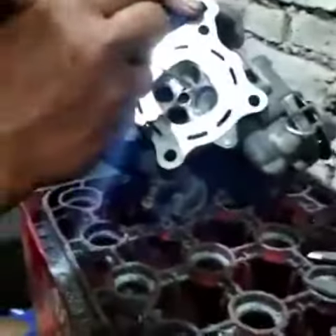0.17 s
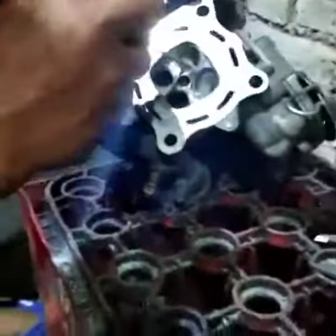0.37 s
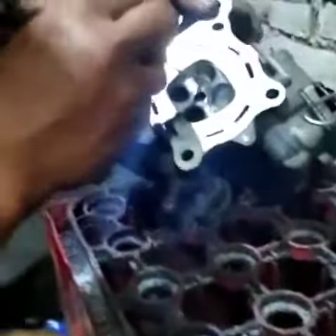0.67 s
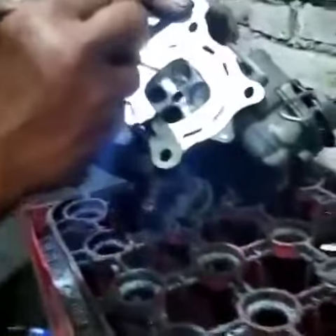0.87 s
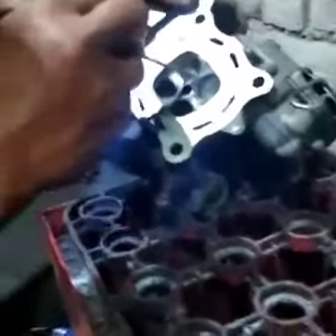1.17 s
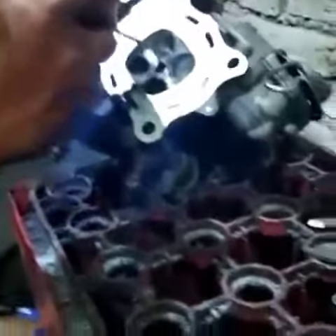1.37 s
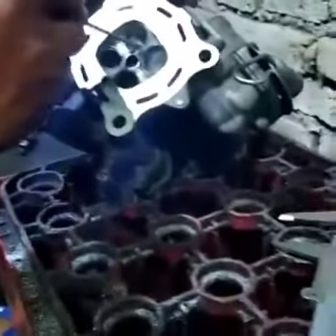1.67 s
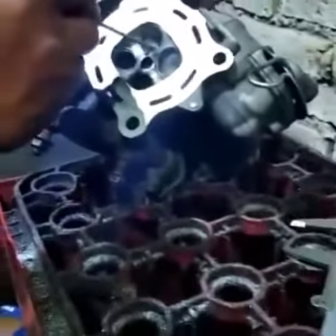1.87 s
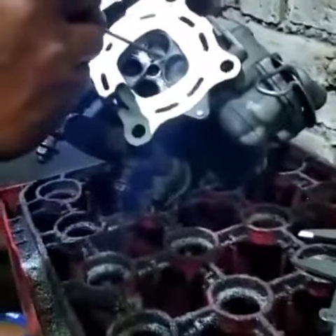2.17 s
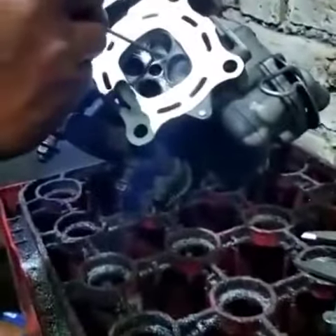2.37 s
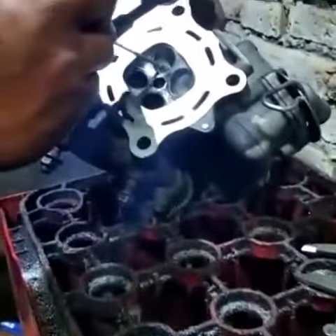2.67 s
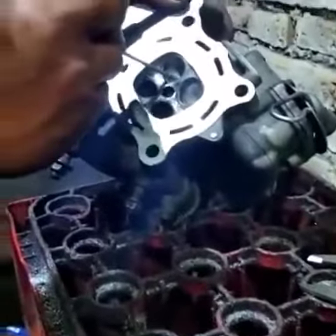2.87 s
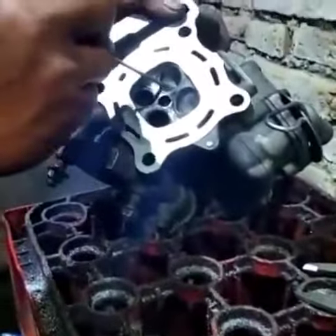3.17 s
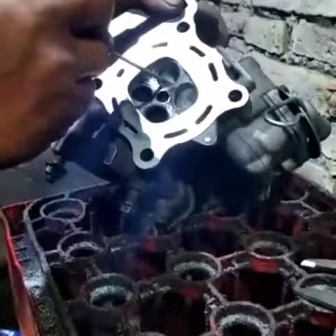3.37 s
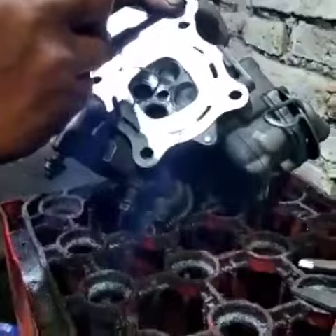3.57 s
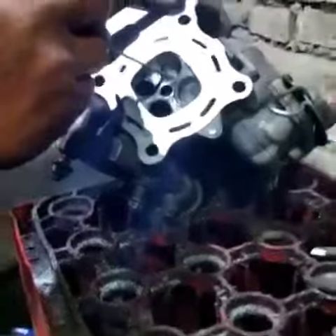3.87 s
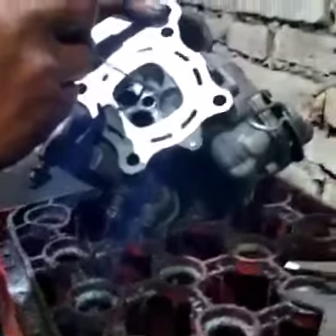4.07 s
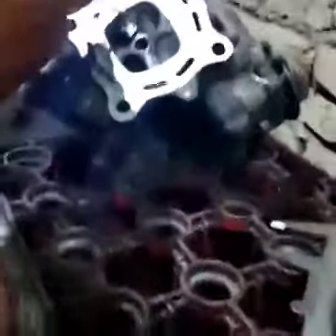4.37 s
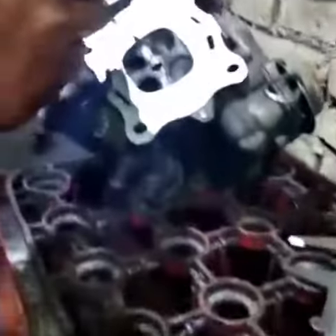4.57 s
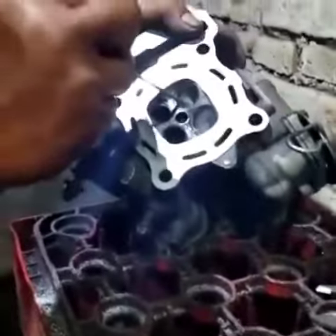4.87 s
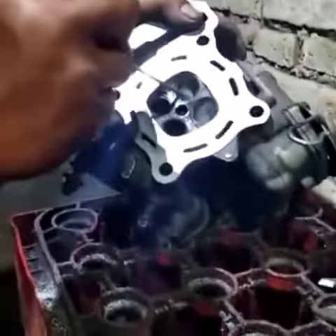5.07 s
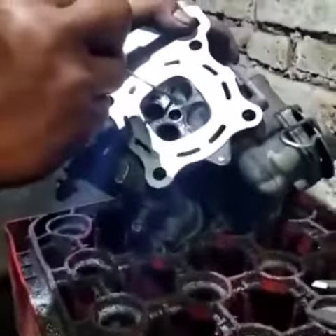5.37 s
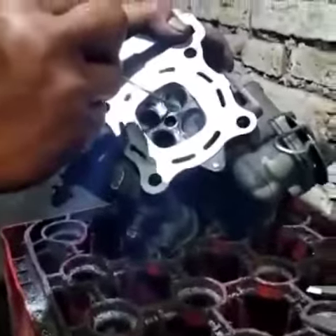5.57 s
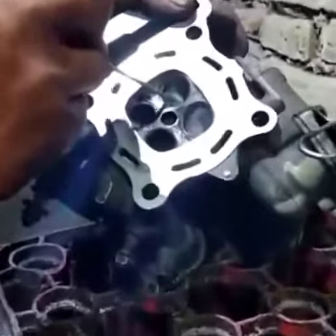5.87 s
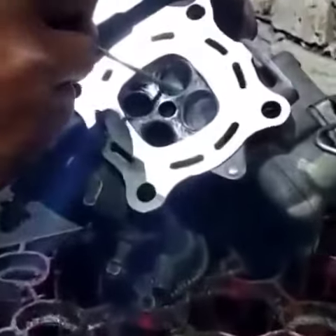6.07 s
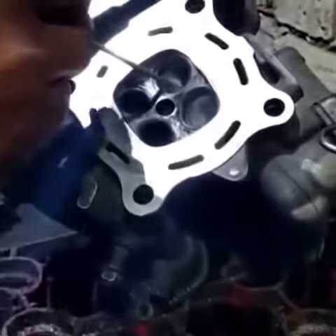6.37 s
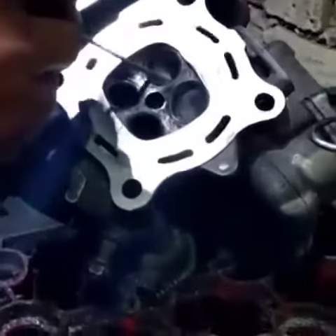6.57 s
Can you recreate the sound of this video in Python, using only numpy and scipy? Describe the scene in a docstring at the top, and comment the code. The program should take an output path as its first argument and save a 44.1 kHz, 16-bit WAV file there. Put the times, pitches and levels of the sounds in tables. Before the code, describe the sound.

A hand-held rotary grinder cuts inside the port of a cast metal cylinder head, close to the microphone in a workshop. For the first half second the bit touches lightly, with scratchy catches and thin steel ticks; another tick comes near 1.1 seconds. From about 0.6 seconds it bites steadily, a dense hissing rasp with rapid chatter and a metallic ring. It speeds up and is loudest between 2 and 3 seconds, snagging on edges. The chatter slows around 4 seconds, then quickens to the end at about 6.7 seconds, turning slightly fizzier after 5 seconds as the bit goes deeper. Small dull bumps touch the microphone near 3.6 and 4.2 seconds. Throughout, a distant engine drones quietly on the left over a low rumble and a faint murmur of other machines.

```python
"""Grinding a cylinder head port

A hand-held rotary grinder cuts inside a port of a cast metal cylinder head in a workshop. The bit runs
slightly out of true, so it bites once a turn; its chips ring the casting and rasp in the treble.
A single-cylinder engine drones far off on the left over a low rumble, and other machines murmur.
Steel ticks thinly near the start; later the camera takes a few dull bumps."""
import sys
import numpy as np
from scipy import signal
from scipy.fft import rfft, irfft, next_fast_len
from scipy.io import wavfile
from scipy.ndimage import uniform_filter1d, map_coordinates

SR = 44100
rng = np.random.default_rng(int(sys.argv[2]) if len(sys.argv) > 2 else 0)


def dump(signal):
    """Clip the signal to [-1, 1] and save it as 16-bit WAV at the path in sys.argv[1]."""
    limited = np.clip(np.atleast_2d(signal).T, -1, 1)
    pcm = np.round(limited * 32767).astype(np.int16)
    wavfile.write(sys.argv[1], SR, pcm)


N = 296352
FFT_SIZE = next_fast_len(N + SR // 2)


def amp(db):
    return 10 ** (np.asarray(db) / 20)


def unit_rms(x):
    return x / np.sqrt(np.mean(x ** 2) + 1e-20)


def curves(rows):
    """One per-sample curve for each column after time_s."""
    time_s, *columns = np.transpose(rows)
    return [np.interp(np.arange(N) / SR, time_s, column) for column in columns]


def wobble(rate_hz):
    """Smooth random curve, rate_hz knots a second."""
    knots = rng.standard_normal(int(N * rate_hz / SR) + 4)
    return map_coordinates(knots, [np.arange(N) * rate_hz / SR])


def filtered(x, response):
    """Filter x by a complex function of frequency in Hz."""
    hz = np.fft.rfftfreq(FFT_SIZE, 1 / SR)
    return irfft(rfft(x, FFT_SIZE) * response(hz), FFT_SIZE)[..., :N]


def shaped(x, spectrum):
    """Filter x by rows of freq_hz, gain_db, ..., joined on a log frequency axis."""
    freq_hz, *gains_db = np.transpose(spectrum)
    return filtered(x, lambda hz: amp([np.interp(np.log1p(hz), np.log1p(freq_hz), g) for g in gains_db]))


# Grinder speed: time_s, rotation_hz
SHAFT_SPEED = [(0, 38), (0.2, 47), (0.5, 51.2), (0.8, 63), (1.4, 77.5), (2.0, 85), (3.2, 89.5), (3.8, 75.1),
               (4.15, 70.8), (4.4, 73.1), (5.3, 92.3), (5.9, 100.2), (6.72, 107.7)]
def bite(runout):
    """The bit's high spot strikes once a turn: a levelled force row per runout value, and knocks."""
    speed_hz, = curves(SHAFT_SPEED)
    turns = np.cumsum(speed_hz * (1 + 0.00988 * wobble(15))) / SR
    strength = amp(0.7 * rng.standard_normal(int(turns[-1]) + 2))[turns.astype(int)]
    # A fast bit skims more evenly; spinning up, it barely touches.
    skim = np.clip(78 / speed_hz, 0, 1.15) ** 2 * np.clip((speed_hz - 40) / 22, 0.3, 1)
    high_spot = strength * skim * np.exp(2.2 * (-np.cos(2 * np.pi * turns) - 1))
    unsteady_hand = amp(0.51 * wobble(23) + 0.5 * wobble(40))
    force = (1 + np.array(runout)[:, None] * high_spot) * unsteady_hand
    running_rms = np.sqrt(np.abs(uniform_filter1d(force ** 2, SR // 8, axis=1)))
    knocks = strength * skim * np.diff(np.floor(turns + 0.5), prepend=0)
    return force / running_rms, knocks


def chips(spiky_db, diffuse_share):
    """Dense chips of uneven size; the diffuse share reaches each microphone by its own path."""
    noise = rng.standard_normal((3, N))
    size = amp(spiky_db * np.clip(rng.standard_normal(N), -2, 2))
    direct, left, right = unit_rms(noise * size)
    return np.sqrt(1 - diffuse_share) * direct + np.sqrt(diffuse_share) * np.array([left, right])


# Bit position: time_s, depth_fraction
BIT_DEPTH = [(0, 0.15), (1, 0.25), (2, 0.19), (3, 0.3), (4, 0.41), (4.85, 0.33), (5.0, 0.78), (5.9, 0.96),
             (6.1, 1), (6.25, 0.97), (6.72, 0.93)]
def bit_depth():
    """Where the bit works: 0 at the port mouth, 1 deep inside."""
    return curves(BIT_DEPTH)[0]


def ringing(drive, modes, waver_db):
    """Each mode has its own left-right pattern; its share wavers as the bit wanders over the wall."""
    hz, spectrum = np.fft.rfftfreq(FFT_SIZE, 1 / SR), rfft(drive, FFT_SIZE)
    depth, out = bit_depth(), 0
    for k, (pitch_hz, width_hz, left_db, right_db, left_lead_rad, deep_gain_db) in enumerate(modes):
        damping = 1j * hz * width_hz
        resonance = (-1) ** k * (damping / (pitch_hz ** 2 - hz ** 2 + damping)) ** 2
        pattern = np.array([[amp(left_db) * np.exp(1j * left_lead_rad)], [amp(right_db)]])
        mode = irfft(spectrum * resonance * pattern, FFT_SIZE)[:, :N]
        out = out + amp(deep_gain_db * depth + waver_db * wobble(7)) * mode
    return out


# Casting and port modes: pitch_hz, width_hz, left_db, right_db, left_lead_rad, deep_gain_db
CASTING_MODES = [(479, 82, -30.5, -36.5, 1, 5), (545, 69, -31, -33, 1.1, 9.5),
                 (689, 154, -43, -24.5, 2, -3.5), (1002, 103, -20, -22, -2.1, -5),
                 (1088, 78, -19, -35, 1.3, 9), (1234, 74, -22.5, -29, 0.36, 2.5),
                 (1412, 126, -20, -18, 4, 3), (1540, 105, -12.5, -11, 3.5, 1), (1729, 124, -20, -4, 2, 1),
                 (1930, 135, -3.5, -0.5, 2, -0.5), (2110, 83, 3, 1.5, 3.5, -1.5),
                 (2210, 163, -2.5, -10.5, 1, 5.5), (2404, 53, -1, -8.5, 3.5, -4),
                 (2707, 87, -11.5, -12.5, 0, -9), (3065, 86, -3, -6, -2, -3.5),
                 (2077, 725, -6.5, -19, 3.5, 2)]
def casting_ring(pressure, force, knocks, jolts):
    """Chips and a dull knock on every turn ring the heavy casting."""
    dull_knocks = amp(29.5) * filtered(knocks, lambda hz: 1 / (1 + 1j * hz / 900))
    chip_drive = (pressure * force + jolts) * chips(spiky_db=4, diffuse_share=0.24)
    return ringing(chip_drive + pressure * dull_knocks, CASTING_MODES, waver_db=0.85)


# Thin wall and bit modes: pitch_hz, width_hz, left_db, right_db, left_lead_rad, deep_gain_db
WALL_MODES = [(2190, 200, -5, -3, 1.5, -2), (3100, 115, -6, -1.5, -3, -4),
              (3326, 150, -6.5, -7.5, -1.5, -1), (4216, 200, -14.5, -11.5, 1.1, 4.5),
              (5890, 130, -13, -12, -2.5, 6), (3820, 340, -7, -12, 2.5, -6), (4542, 450, -14, -5.5, 1, 1),
              (5000, 223, -10.5, -11, 0.6, 8.5), (6250, 300, -14, -16, -2.4, 0),
              (7385, 450, -18, -8, 1.5, -0.5), (8416, 164, -18.5, -9, 2, 13),
              (8990, 160, -5.5, -5, 1.3, 4.5), (9900, 340, -5.5, -14, 2.5, -2)]
# Spectrum of breaking chips: freq_hz, left_db, right_db
RASP_SPECTRUM = [(295, -28, -52), (910, -18, -10.5), (2520, -5.5, -5), (2920, -4, -3.5), (4880, -7, -7),
                 (5800, -12, -9.5), (6660, -6, -3.5), (8600, -4, -2.5), (10000, -3, -5), (10170, -7, -10.5),
                 (9970, -10, -8), (11320, -10.5, -11.5), (13400, -17, -19), (14100, -11, -23)]
def chip_rasp(pressure, force, jolts):
    """Chips ring the thin walls and rasp as they break; deep inside, scrape falls and fizz rises."""
    grit = pressure * force * amp(0.56 * wobble(21.98)) + jolts
    walls = amp(3) * ringing(grit * chips(spiky_db=6.5, diffuse_share=0.29), WALL_MODES, waver_db=2)
    bright = walls + shaped(grit * chips(spiky_db=1.5, diffuse_share=1), RASP_SPECTRUM)
    scrape = filtered(bright, lambda hz: 1 / (1 + (hz / 5800) ** 12))
    fizz = filtered(bright, lambda hz: 1 / (1 + (10300 / (hz + 1)) ** 30))
    middle = bright - scrape - fizz
    depth, scrape_deep_db, fizz_deep_db = bit_depth(), -1.5, 1
    scrape_gain = amp(scrape_deep_db * depth)
    fizz_gain = amp(fizz_deep_db * depth + 1.1 * wobble(4.7))
    return scrape_gain * scrape + middle + fizz_gain * fizz


def ragged_spectrum(x, patchy_db):
    """Narrow patches of the spectrum swell and sink at random, a ragged warble as in compressed audio."""
    spectra = signal.stft(x, nperseg=1024)[2]
    patches = uniform_filter1d(rng.standard_normal(spectra.shape[1:]), size=3, axis=0)
    patches = uniform_filter1d(patches, size=5, axis=1)
    return signal.istft(spectra * amp(patchy_db * unit_rms(patches)), nperseg=1024)[1][:, :N]


# Steady work of the bit: time_s, casting_db, rasp_db
CUTTING_DRIVE = [(0, -41, -40.5), (0.34, -36, -33.5), (0.535, -45, -30), (0.565, -18.5, -27),
                 (0.7, -23, -27), (0.82, -16.5, -24.5), (1.35, -16, -23), (1.46, -17, -24),
                 (1.58, -11, -21), (1.92, -10, -20.5), (2.36, -5, -17), (2.8, -12, -21), (3.3, -16, -24.5),
                 (4.1, -15.5, -25), (4.7, -14, -23.5), (5.1, -15, -22.5), (5.7, -16.5, -21),
                 (6.72, -14.5, -19.5)]
def grinder():
    """Hand pressure, bites and catches drive the casting's ring and the chips' rasp."""
    casting_pressure, rasp_pressure = amp(curves(CUTTING_DRIVE) + digs())
    (casting_force, rasp_force), knocks = bite(runout=[1.1, 0.6])
    casting_jolts, rasp_jolts = catches()
    ring = casting_ring(casting_pressure, casting_force, knocks, casting_jolts)
    rasp = chip_rasp(rasp_pressure, rasp_force, rasp_jolts)
    return ragged_spectrum(ring + rasp, patchy_db=1.98)


# Engine speed: time_s, firing_hz
FIRING_RATE = [(0, 28.5), (0.75, 28.3), (1.15, 23.5), (1.7, 22.7), (2.75, 22.4), (3.1, 24.1), (3.55, 25.2),
               (4.6, 25.9), (5.15, 27.4), (5.9, 28), (6.72, 28)]
# Exhaust harmonics before panning: time_s, h4_db, h5_db, h6_db, h7_db, h8_db
EXHAUST_HARMONICS = [(0.0, -66, -69, -59, -71, -64), (0.69, -59, -60, -68, -82, -78),
                     (1.1, -72, -60, -71, -66, -78), (1.57, -68, -75, -78, -69, -75),
                     (1.91, -75, -74, -66, -56, -73), (2.3, -75, -83, -58, -64, -69),
                     (2.75, -75, -70, -70, -66, -72), (3.1, -67, -53, -62, -56, -61),
                     (3.67, -66, -68, -56, -67, -77), (4.32, -67, -57, -55.5, -63, -61.5),
                     (4.73, -61, -74, -54, -77, -64), (5.05, -55, -58, -57.5, -66, -80),
                     (5.4, -60, -56.5, -50, -64, -82), (5.9, -69, -52, -55.5, -52, -78),
                     (6.25, -69, -60.5, -55, -56.5, -78), (6.72, -62, -47.5, -58, -49.5, -78)]
# Rumble spectrum: freq_hz, gain_db
RUMBLE_SPECTRUM = [(15, -62), (25, -41), (81, -3), (98, -4.5), (123, 3.5), (166, 0), (188, -9), (260, -11),
                   (340, -9), (570, -120)]
# Rumble before panning: time_s, level_db
RUMBLE_ENVELOPE = [(0, -59.5), (1, -58.5), (2, -58.5), (3, -58), (4, -58.5), (5, -60), (6, -61.5),
                   (6.72, -63)]
def engine():
    """Harmonics 4 to 8 of the firing rate drone over a low rumble, much stronger on the left."""
    (firing_hz,), (rumble_db,) = curves(FIRING_RATE), curves(RUMBLE_ENVELOPE)
    phase = 2 * np.pi * np.cumsum(firing_hz * (1 + 0.0019 * wobble(16))) / SR
    drone = 0
    for k, level_db in enumerate(curves(EXHAUST_HARMONICS), start=4):
        peak = np.sqrt(2) * amp(level_db + wobble(9.2))
        drone = drone + peak * np.sin(k * phase + rng.uniform(0, 2 * np.pi))
    rumble = unit_rms(shaped(rng.standard_normal((2, N)), RUMBLE_SPECTRUM))
    left_rumble, right_rumble = amp(rumble_db) * rumble
    return (drone + left_rumble) * amp([[4.5], [-10.5]]) + right_rumble * amp([[-20], [-12]])


# Machine murmur spectrum: freq_hz, gain_db
MURMUR_SPECTRUM = [(150, -67), (250, -5.5), (357, 5), (463, 7.5), (572, 7.5), (2210, -10), (2500, -3),
                   (3250, -49), (5500, -120)]
def workshop():
    """A steady murmur of machines, partly alike at both microphones."""
    both, left, right = unit_rms(shaped(rng.standard_normal((3, N)), MURMUR_SPECTRUM))
    return amp(-63 + 1.7 * wobble(3.93)) * (both + 0.72 * np.array([left, right]))


# Jolts of the bit: start_s, casting_db, rasp_db
EDGE_CATCHES = [(0.1445, -28, -26.5), (0.2036, -15, -18), (0.287, -19.5, -28), (0.3115, -29, -19.5),
                (0.3414, -12, -38), (0.402, -24.5, -29), (0.463, -22, -25), (0.5594, -23, -28.5),
                (0.579, -17, -30), (0.6194, -11.5, -38), (0.827, -10.5, -22), (1.078, -2, -18),
                (1.311, 5, -23), (1.5778, -20, -22), (1.953, -11.5, -12), (2.1246, -5, -15),
                (2.2712, -6.5, -10), (2.386, -0.6, -29), (2.4936, 1, -15), (2.516, 4, -11),
                (2.615, 9, -18.5), (2.823, -7, -31), (3.0894, -10, -21.5), (3.3674, -15.5, -26),
                (3.6123, -7.5, -17.5), (3.7534, -5, -30), (3.778, -8, -19), (4.212, -1.1, -20),
                (4.2812, 2, -28), (4.448, -3, -24), (4.92, 2, -24), (5.1975, -3, -23), (6.0564, 4, -21.5),
                (6.4105, -4, -13.5)]
def catches():
    """The bit catches on edges: one row of jolts for the casting, a sharper one for the rasp."""
    jolts, t = np.zeros((2, N)), np.arange(SR // 20) / SR
    soft = amp(-60 * t / 0.018) * (1 - np.exp(-t / 0.0018))
    sharp = soft + amp(-2.5 - 60 * t / 0.005)
    for start_s, casting_db, rasp_db in EDGE_CATCHES:
        jolts[:, round(start_s * SR):][:, :len(t)] += amp([[casting_db], [rasp_db]]) * [soft, sharp]
    return jolts


# Steel ticks: start_s, level_db
STEEL_TICKS = [(0.2045, -36), (0.463, -40), (1.078, -26)]
def steel_ticks(rise_s=0.0015, t60_s=0.035, highpass_hz=11500):
    """Steel on metal gives brief, thin bursts of noise at the top of the band."""
    t, envelope = np.arange(N) / SR, 0
    for start_s, level_db in STEEL_TICKS:
        age_s = np.maximum(t - start_s, 0)
        envelope = envelope + amp(level_db - 60 * age_s / t60_s) * np.minimum(age_s / rise_s, 1)
    bursts = envelope * rng.standard_normal((2, N))
    return filtered(bursts, lambda hz: 1 / (1 + (highpass_hz / (hz + 1)) ** 8))


# Pushes of the hand: peak_s, casting_db, rasp_db, fade_s
HAND_DIGS = [(0.286, 11, 1.5, .1), (0.462, 13, -0.5, .04), (2.28, 0, 1, .08), (2.49, 2.5, 3, 0.034),
             (2.822, 8, 7, 0.9), (3.09, 0, 2.5, 0.066), (3.58, 7, 1.5, 0.07), (3.78, 2.5, -0.5, 0.18),
             (4.141, 3.5, 1.5, 0.043), (4.44, 4, 2, 0.037), (4.93, 2, 2, .1), (5.13, 2, 1.5, 0.023),
             (5.2, 2.5, 2, 0.02), (5.35, 1, 1.5, 0.11), (5.7, 3.5, 0.5, 0.15), (5.98, 3.5, 0.5, 0.27),
             (6.4, 3.5, -2, 0.023), (6.538, 7, 1.5, 0.019), (6.6, 4.5, -0.5, 0.024)]
def digs(rise_s=0.022, ease_s=0.058, ease_share=0.13):
    """The hand eases off, then digs the bit in: rows of gain in dB for the casting and the rasp."""
    gain_db, t = np.zeros((2, N)), np.arange(N) / SR
    for peak_s, casting_db, rasp_db, fade_s in HAND_DIGS:
        rise = np.clip((t - peak_s) / rise_s + 1, 0, 1)
        push = rise * np.exp(-np.maximum(t - peak_s, 0) / fade_s)
        ease = (1 - rise) * ease_share * np.exp(np.minimum(t - peak_s, 0) / ease_s)
        gain_db += np.array([[casting_db], [rasp_db]]) * (push - ease)
    return gain_db


# Camera taps: start_s, level_db, pitch_hz, left_over_right_db, knock_over_tap_db
CAMERA_BUMPS = [(3.638, -27, 1000, -6, -14), (4.213, -36, 520, -10, -10), (4.224, -29, 950, -10, 0),
                (4.272, -42, 330, -6, -10)]
def camera_bumps(knock_hz=470):
    """Short dull taps on the camera body, each a damped tone with a slower knock."""
    out, t = np.zeros((2, N)), np.arange(SR // 20) / SR
    for start_s, level_db, pitch_hz, pan_db, knock_db in CAMERA_BUMPS:
        knock = amp(knock_db - 60 * t / 0.033) * np.sin(2 * np.pi * knock_hz * t)
        knock *= 1 - np.exp(-t / 0.0062)
        tap = amp(-60 * t / 0.016) * np.sin(2 * np.pi * pitch_hz * t)
        tap *= 1 - np.exp(-t / 0.0005)
        gains = amp([[level_db + pan_db / 2], [level_db - pan_db / 2]])
        out[:, round(start_s * SR):][:, :len(t)] += gains * (knock + tap)
    return out


def scene():
    return grinder() + engine() + workshop() + steel_ticks() + camera_bumps()


def record(dry):
    """The phone rounds off the highest peaks and keeps nothing above its band limit."""
    ceiling, limit_hz = 0.5, 14280
    rounded = dry / (1 + np.abs(dry / ceiling) ** 4) ** (1 / 4)
    return filtered(rounded, lambda hz: 1 / (1 + np.minimum(hz / limit_hz, 1.5) ** 600))


dry = scene()
out = record(dry)
dump(out)
```